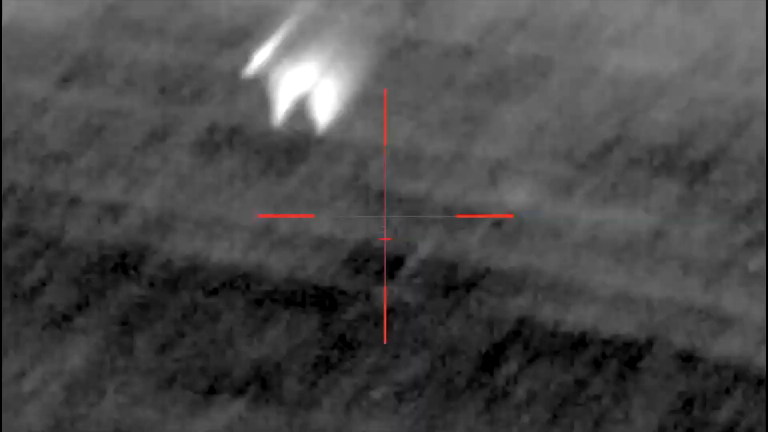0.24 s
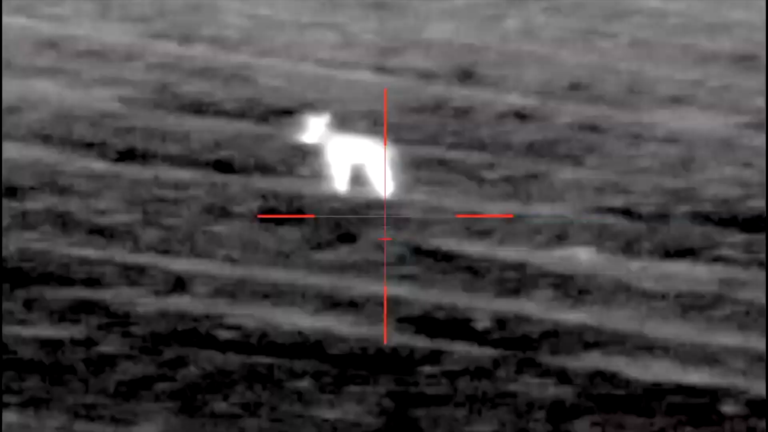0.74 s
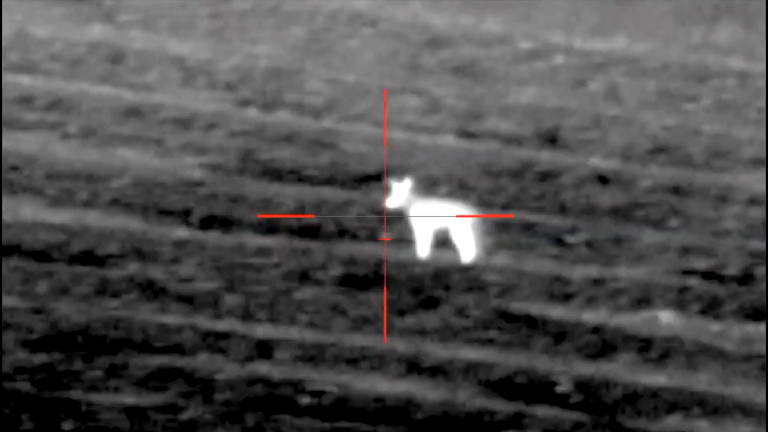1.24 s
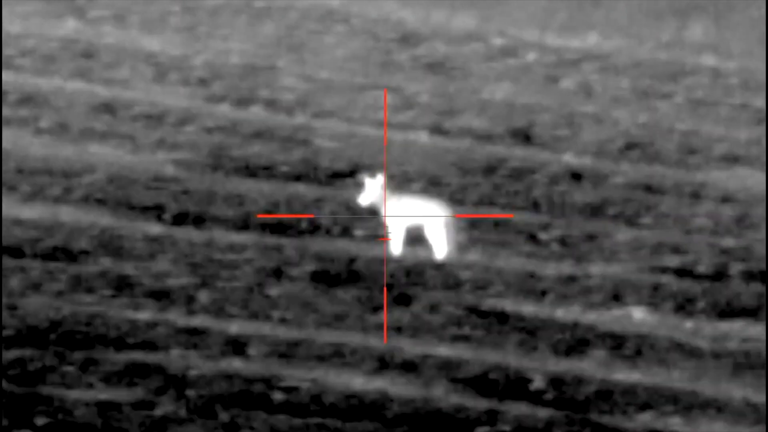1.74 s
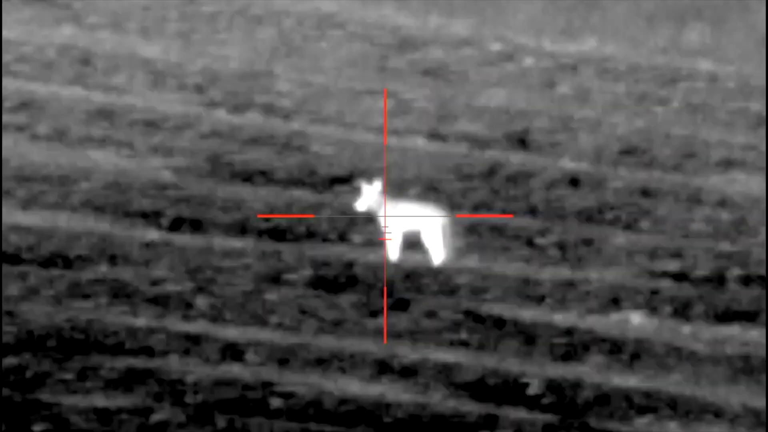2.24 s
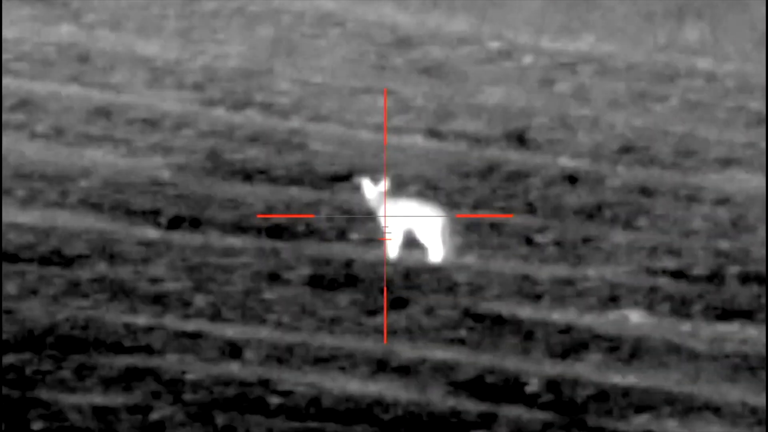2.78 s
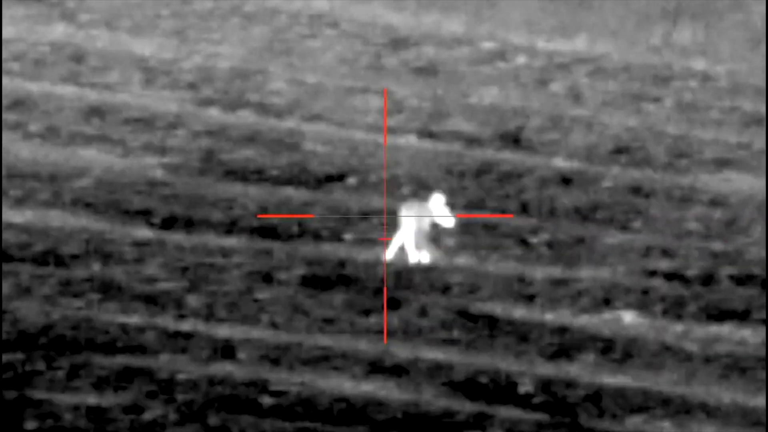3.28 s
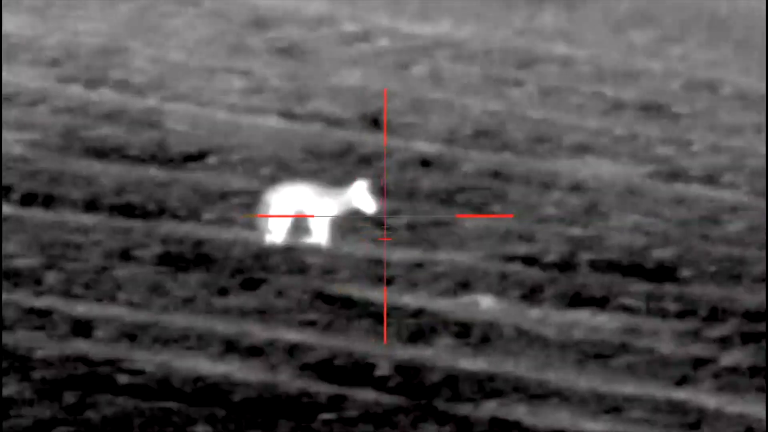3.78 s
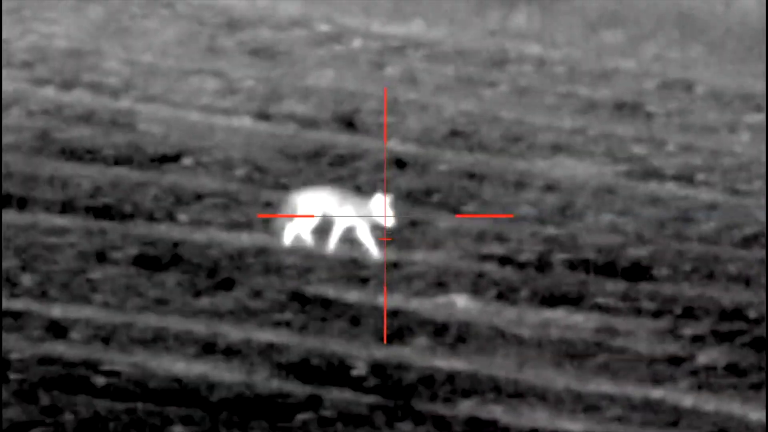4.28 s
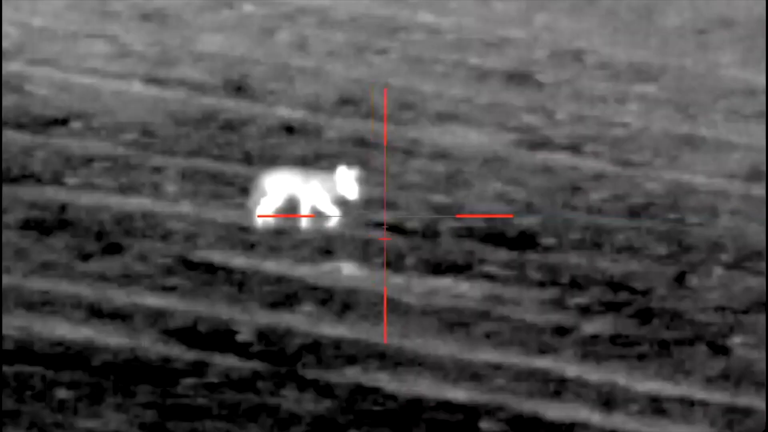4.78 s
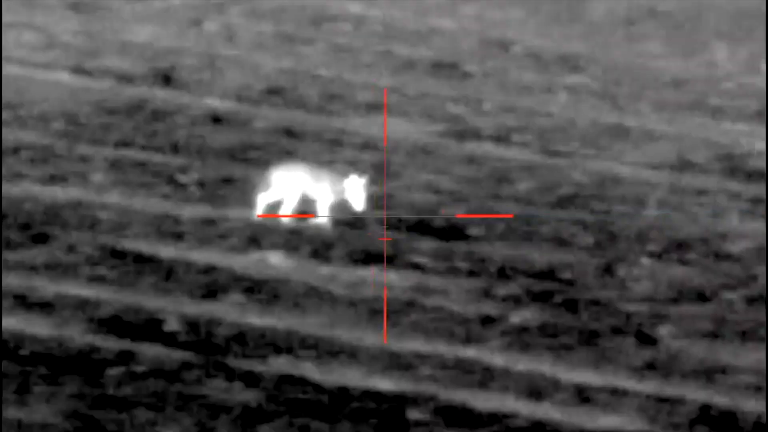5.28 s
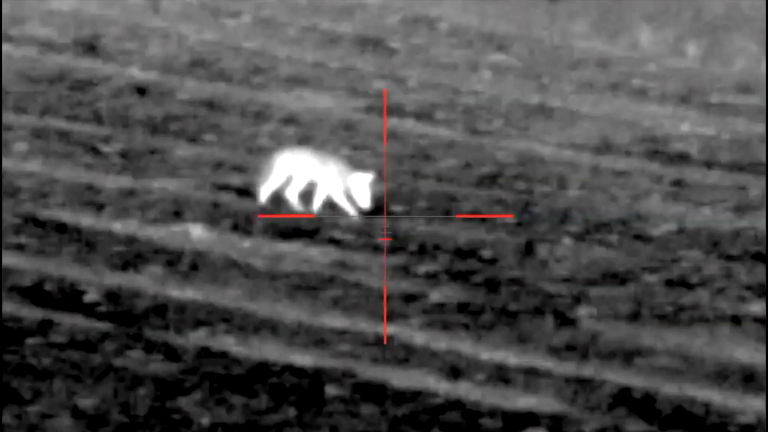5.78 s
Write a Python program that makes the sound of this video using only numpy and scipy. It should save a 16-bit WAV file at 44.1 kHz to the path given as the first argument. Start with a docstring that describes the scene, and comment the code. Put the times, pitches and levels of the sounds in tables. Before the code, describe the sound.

A near cricket gives three loud three-stroke chirps over a steady low insect trill and distant chorus, with soft gear knocks early on.

```python
"""Gear knocks and rustles briefly over a low even trill, a far insect chorus and a faint hiss in an open field at night.
A quick caller throbs in phrases, high chirpers pip above, and a near cricket joins, three strong strokes a chirp.
Wind buffets low underneath. Insects are mostly short bent near-sines or a gated sine, most with scattered tails;
knocks are decaying modes plus a noise crack; rustle, an opening chorus swell, wind and floor are shaped noise."""
import sys
import numpy as np
from scipy import signal
from scipy.fft import rfft, irfft
from scipy.io import wavfile
from scipy.ndimage import uniform_filter1d

SR = 44100
rng = np.random.default_rng(int(sys.argv[2]) if len(sys.argv) > 2 else 0)


def master(y):
    """Save y as 16-bit WAV."""
    cut = np.clip(np.atleast_2d(y).T, -1, 1)
    pcm = np.round(cut * 32767)  # scale
    wavfile.write(sys.argv[1], SR, pcm.astype(np.int16))


N = 265482


def undb(db):
    """Gain of a level in dB."""
    return 10 ** (np.asarray(db) / 20)


def curve(rows):
    """Columns of a table of (s, value, ..) interpolated at every sample."""
    s, *columns = np.transpose(rows)
    return [np.interp(np.arange(N) / SR, s, c) for c in columns]


def colour(x, points):
    """Filter by (Hz, dB) points joined on a log frequency axis."""
    hz, db = np.transpose(points)
    bin_hz = np.maximum(np.arange(len(x) // 2 + 1) * SR / len(x), 1)
    gain = undb(np.interp(np.log(bin_hz), np.log(hz), db))
    return irfft(rfft(x) * gain, len(x))


def unit(x):
    """Scale to rms 1."""
    return x / np.sqrt(np.mean(x ** 2))


def walk(rate_hz):
    """Random levels held 1 / rate_hz seconds, smoothed twice over that time; rms about 1."""
    hold = int(SR / rate_hz)
    steps = np.repeat(rng.standard_normal(N // hold + 1), hold)
    smooth = uniform_filter1d(uniform_filter1d(steps, hold), hold)
    return unit(smooth[:N])


def add(out, start_s, sound):
    """Mix a short sound in at a time, clipped to the scene."""
    i = int(start_s * SR)
    a, b = max(i, 0), min(i + len(sound), N)
    if b > a:
        out[a:b] += sound[a - i:b - i]


def stroke(shape, length_s, hz, bend, turn, third_db=-120):
    """One wing stroke: the file drives the wing membrane as a near sine that swells, bends and dies."""
    share, db, sag = np.transpose(shape)
    at_share = np.arange(share[0], share[-1], 1 / (length_s * SR))
    pitch_hz = hz + bend * np.interp(at_share, share, sag)
    phase = 2 * np.pi * (turn + np.cumsum(pitch_hz) / SR)
    gain = undb(np.interp(at_share, share, db))
    gain = uniform_filter1d(gain, len(at_share) // 14 + 1)  # the wing's mass rounds the corners
    third = undb(third_db) * gain ** 3 * np.sin(3 * phase)
    return gain * np.sin(phase) + third


def strokes(times_s, db, hz, length_s, fall_hz, scatter_db=0., scatter_hz=0.):
    """Many small falling strokes centred on their times, with scattered level, pitch and phase."""
    # Each row: share of the stroke length, level in dB, pitch bend as a share of the fall.
    small_shape = [(0, -30, 0), (.15, -12, .05), (.4, -2, .4), (.55, 0, .55), (.75, -4, .85), (1., -22, 1.)]
    out, chance = np.zeros(N), rng.standard_normal((len(times_s), 3))
    for t, level_db, f, (a, b, turn) in zip(times_s, db, hz, chance):
        start_hz = f + fall_hz / 2 + scatter_hz * b
        sound = stroke(small_shape, length_s, start_hz, -fall_hz, turn)
        add(out, t - length_s / 2, undb(level_db + scatter_db * a) * sound)
    return out


def beats(rate_hz, lead):
    """Sample numbers at which a singer strikes; lead shifts the even beat, in strokes."""
    count = np.floor(rate_hz * np.arange(N) / SR + lead)
    return np.flatnonzero(np.diff(count) > 0)


def field(x, t60_s, wet_db, stir_hz=150., gap_s=0.):
    """A scattered tail from grass and ground; moving air and blades stir it, which blurs its pitch."""
    t = np.arange(int(SR * .3)) / SR
    decay = np.exp(-np.log(1000) * t / t60_s)
    onset = np.clip((t - gap_s) / 0.012, 0, 1)
    tail = rng.standard_normal((2, len(t))) * decay * onset
    wet = sum(walk(stir_hz) * signal.fftconvolve(x, path)[:N] for path in tail)
    return undb(wet_db) * wet / np.sqrt(np.sum(tail ** 2))


def floor():
    """Air and self noise in octave bands that each flicker; the treble part also swells slowly."""
    # Each row: frequency in Hz, relative density in dB per Hz.
    floor_colour = [(20, -32.5), (60, -23.5), (120, -13.5), (380, -25.5), (700, -28.5), (1750, -34.5),
                    (3400, -34.5), (4000, -31.5), (5000, -9.5), (5700, -18), (6900, -38.5), (8500, -32),
                    (10300, -25), (12000, -30), (15600, -32.5)]
    # Treble hiss swell. Each row: time in seconds, gain in dB.
    hiss_swell = [(0, 8), (.5, 1.5), (1.1, 0), (2.5, 0), (3.0, 0.5), (3.45, -5), (4.2, -5), (4.55, 0),
                  (5.2, -2), (6.02, -3.5)]
    bed = unit(colour(rng.standard_normal(N), floor_colour)) * undb(-60.5)
    out, together, swell_db = 0, walk(16), curve(hiss_swell)[0]
    for hz in 30 * 2. ** np.arange(10):
        band = colour(bed, [(hz / 2, -60), (hz / 1.615, -14), (hz / 1.273, -6), (hz, 0),
                            (hz * 1.61, -6), (hz * 1.796, -14), (hz * 2, -60)])
        flicker_db = 1.1 * together + 1.3 * walk(18)
        out = out + band * undb(flicker_db + swell_db * (hz > 6000))
    return out


def tree_cricket():
    """Even low trill, each stroke falling; an echo follows it and a thin tail from the distance."""
    # Each row: time in seconds, lead on an even beat in strokes, stroke level in dB.
    trill = [(0, 0.45, -51.5), (1.4, 0.45, -49), (2.2, 0.45, -50), (2.9, 0.49, -51), (3.6, 0.5, -52.5),
             (4.1, 0.43, -51.5), (4.9, 0.35, -49.5), (5.6, 0.3, -49.5), (6.02, 0.39, -51)]
    lead, db = curve(trill)
    at = beats(22.56, lead)
    dry = strokes(at / SR, db[at], np.full(len(at), 2695.), 0.023, 210., scatter_db=0.3, scatter_hz=15.)
    echo = undb(-12.0 + 2.3 * walk(30)) * np.roll(dry, int(0.012 * SR))
    near_tail = field(dry, 0.054, -16.5, stir_hz=110.0)
    far_tail = field(dry, 0.25, -15, stir_hz=50.0)
    return dry + echo + near_tail + far_tail


def chorus():
    """Far singers trill on their own beats, coming and going; a crowd behind them strikes at random."""
    # Each row: pitch in Hz, strokes a second, mean stroke level in dB before the swell.
    singers = [(4370, 41, -73), (4625, 64, -65), (4707, 54, -61), (4870, 67, -58.5), (4957, 110, -58.5),
               (5180, 92, -54.5), (5280, 59, -58.5), (5424, 120, -58)]
    # Each row: centre pitch in Hz, pitch spread in Hz, strokes a second, mean level in dB before the swell.
    crowd = [(4777, 270, 340, -65.5), (6344, 220, 130, -73), (2091, 40, 300, -77.5)]
    # Each row: time in seconds, gain in dB.
    chorus_swell = [(0, -1), (.45, 2.5), (1.0, 3), (2.28, -2), (2.9, .5), (3.2, -1), (4.05, -1.5),
                    (4.36, 1.5), (6.02, -2.5)]
    out = np.zeros(N)
    for hz, rate_hz, db in singers:
        at = beats(rate_hz, rng.random())
        level_db = db + 3.77 * walk(9)[at]
        out += strokes(at / SR, level_db, np.full(len(at), hz), .012, 80., scatter_db=1.5, scatter_hz=30.5)
    for centre_hz, spread_hz, rate_hz, db in crowd:
        times_s = rng.random(2000)[:int(rate_hz * N / SR)] * N / SR
        count = len(times_s)
        out += strokes(times_s, np.full(count, db), np.full(count, centre_hz), 0.01, 120.0,
                       scatter_db=3.5, scatter_hz=spread_hz)
    return (out + field(out, 0.084, -2.5)) * undb(curve(chorus_swell)[0])


def wind():
    """Low buffeting on the microphone: a wandering breeze, and gusts that swell and drop."""
    # Each row: time in seconds, mean breeze level in dB.
    breeze = [(0, -77), (1.6, -74), (2.8, -75), (3.7, -84), (4.4, -72.5), (5.1, -77), (6.02, -84)]
    # Each row: peak time in seconds, peak level in dB before flicker, time from peak to 1/e in seconds.
    gust_rows = [(0.368, -68, 0.053), (.6, -71, 0.054), (1.05, -68, 0.028), (1.272, -69.5, 0.037),
                 (1.53, -64, 0.038), (1.83, -68.5, 0.047), (3.0, -62.5, 0.028), (4.29, -64.5, 0.092),
                 (4.533, -59.5, .05), (4.938, -67, .07), (5.35, -69, 0.031), (5.979, -70, .03)]
    low = colour(rng.standard_normal(N),
                 [(12, -32), (25, -2.5), (55, 2.0), (90, -7), (200, -25.0), (800, -61.5)])
    t = np.arange(N) / SR
    gusts = sum(undb(db) * np.exp(-((t - peak_s) / half_s) ** 2) for peak_s, db, half_s in gust_rows)
    breeze_gain = undb(curve(breeze)[0] + 2.5 * walk(4.4))
    flicker = undb(2.5 * walk(9.9))
    return unit(low) * (breeze_gain + gusts) * flicker


def knocks():
    """Soft knocks of gear: a noise crack, and the decaying modes of one small body."""
    # Each row: time in seconds, level in dB, brightness in dB per octave.
    knock_rows = [(0.065, -35, 1.5), (0.461, -46.5, -4), (0.733, -49.5, 6), (1.01, -38, 7), (1.149, -60, 2),
                  (2.08, -60.5, -34), (4.906, -75, -9), (5.208, -56, 7)]
    # Each row: mode frequency in Hz, mean relative level in dB, t60 in seconds.
    modes = [(573, -19, 0.12), (738, -2.5, 0.11), (1040, 1, 0.053), (1193, 1.5, 0.055), (1520, -4, 0.04),
             (1640, 4, 0.015), (1970, -6, 0.019), (3300, -3, 0.037)]
    out, t = np.zeros(N), np.arange(int(.12 * SR)) / SR
    chances = rng.standard_normal((len(knock_rows), len(modes)))
    for (time_s, db, tilt_db), chance in zip(knock_rows, chances):
        ring = np.zeros(len(t))
        for (hz, mode_db, t60_s), c in zip(modes, chance):
            gain = undb(mode_db + tilt_db * np.log2(hz / 1000) + 0.83 * c)
            ring += gain * np.sin(2 * np.pi * hz * t) * np.exp(-np.log(1000) * t / t60_s)
        crack = colour(rng.standard_normal(len(t)),
                       [(200, -20), (600, 0), (3500, tilt_db - 6), (4500, -40), (6000, -70)])
        crack = crack * np.exp(-t / .009)
        blow = ring / np.abs(ring).max() + undb(-5) * crack / np.abs(crack).max()
        add(out, time_s - .003, undb(db) * blow * np.minimum(t / 0.0044, 1))
    return out


def rustles_and_opening_swell():
    """Rustles of cloth and grass, and an opening chorus swell near 5.4 kHz: grainy noise bands that die away."""
    # Each row: start in seconds, decay length in seconds, level in dB, centre in Hz, nominal width in Hz.
    # The 5440 Hz row is the chorus swell.
    band_rows = [(0, 0.62, -74, 910, 1230), (0, 0.33, -51, 5440, 940), (0.082, 0.38, -65.5, 3860, 704),
                 (0.42, 0.26, -72.5, 650, 498), (0.811, 0.33, -72, 354, 250), (0.861, 0.13, -61, 1490, 297),
                 (0.881, 0.33, -68, 890, 500), (0.986, 0.16, -68, 1454, 148),
                 (1.783, 0.42, -77.5, 745, 302), (4.895, 0.11, -71.5, 825, 348),
                 (5.188, 0.064, -69, 343, 149.2)]
    out = np.zeros(N)
    grains = rng.standard_normal(N) * undb(2.2 * walk(120))
    for start_s, length_s, db, hz, width_hz in band_rows:
        edges_hz = [hz - width_hz / 1.9, hz + width_hz / 2.4]
        sos = signal.butter(2, edges_hz, "band", fs=SR, output="sos")
        band = unit(signal.sosfilt(sos, grains))
        age = (np.arange(N) / SR - start_s) / length_s
        out += undb(db) * band * np.clip(age / 0.065, 0, 1) * np.exp(-np.clip(age, 0, 5) ** 2)
    return out


def caller():
    """Quick strokes in phrases that swell and stop; the wing rings in step from stroke to stroke."""
    # Each row: time in seconds, lead on an even stroke beat in strokes.
    stroke_lead = [(0, 0.29), (.5, 0.2), (2., 0.24), (3., 0.068), (4., 0.014), (4.6, .1), (5., -0.11),
                   (6.02, -0.054)]
    # Each row: time in seconds, lead on an even phrase beat in phrases.
    phrase_lead = [(0, .9), (.5, .9), (.8, .97), (1., .8), (1.7, .84), (3.25, .7), (4.3, 1.12), (4.96, .97),
                   (6.02, .9)]
    # Each row: time in seconds, mean phrase level in dB, mean pitch in Hz.
    phrase_rows = [(.1, -43, 5440), (.26, -46, 5420), (.43, -38.5, 5434), (.59, -36.5, 5330),
                   (.75, -35, 5385), (.93, -41, 5454), (1.1, -56, 5305), (1.26, -46, 5290),
                   (1.57, -46.5, 5385), (1.75, -47.5, 5270), (2.04, -45, 5400), (2.2, -50, 5300),
                   (2.37, -47, 5276), (2.85, -51.5, 5300), (3.0, -45.5, 5390), (3.33, -51, 5380),
                   (4.2, -56, 5350), (4.4, -42.5, 5410), (4.56, -44.5, 5460), (4.72, -40, 5440),
                   (4.89, -44, 5450), (5.05, -52, 5350), (6.02, -61, 5390)]
    stroke_rate_hz, phrase_rate_hz = 67.3, 6.26
    rise_share, fall_share, gap_db = .5, .2, -14  # shares of a phrase; level between phrases
    t = np.arange(N) / SR
    beat = phrase_rate_hz * t + curve(phrase_lead)[0]
    # a phrase keeps the level and pitch found .6 of the way through it
    held = np.minimum(np.searchsorted(beat, np.floor(beat) + .6), N - 1)
    db, hz = (column[held] for column in curve(phrase_rows))
    place = beat % 1
    phrase = np.clip(np.minimum(place / rise_share, (1 - place) / fall_share), 0, 1)
    turns = stroke_rate_hz * t + curve(stroke_lead)[0]
    throb = (.5 + .5 * np.cos(2 * np.pi * turns)) ** 0.71
    wing = np.sin(2 * np.pi * np.cumsum(hz + 10.0 * walk(40)) / SR)
    level_db = uniform_filter1d(db, SR // 100) + gap_db * (1 - phrase) + 1.8 * walk(70)
    dry = undb(level_db) * throb * wing
    return dry + field(dry, .06, -13)


def high_chirpers():
    """Single falling pips, even ticks, stray strokes from the chorus, and closer, drier buzzes."""
    # Each row: middle in seconds, peak in dB, pitch in Hz.
    pips = [(0.186, -58, 6030), (0.2656, -56, 6140), (0.696, -55, 6140), (0.7854, -52, 6280),
            (0.8084, -55, 6300), (1.112, -60, 6330), (1.425, -58, 6370), (1.714, -57, 6330),
            (2.3504, -54, 6360), (2.665, -60.5, 6390), (3.635, -58, 6380), (4.0415, -56.5, 6330),
            (4.3553, -54.5, 6340), (4.7115, -55, 6330), (4.802, -56, 6320), (4.816, -58, 6400),
            (5.089, -53, 6360), (5.28, -58, 6340), (5.4324, -59, 6380)]
    # Stray chorus strokes. Each row: middle in seconds, peak in dB, pitch in Hz.
    solos = [(0.370, -42, 4890), (0.6733, -39.5, 5070), (0.8105, -45, 4800), (1.048, -41.5, 4910),
             (1.3333, -46, 4910), (1.9928, -44, 5130), (2.8853, -45.5, 4996), (4.1818, -39, 4930),
             (5.365, -47, 5250), (5.933, -48, 5190)]
    # Each row: first tick in seconds, end in seconds, ticks a second, mean pitch in Hz, mean level in dB.
    tickers = [(.52, 3.42, 11.76, 6434, -65.5), (3.35, 3.9, 11, 6720, -71)]
    # Five growing strokes a row: first stroke in seconds, mean last stroke level in dB, pitch in Hz.
    buzzes = [(5.284, -43.5, 6520), (5.802, -45, 6520)]
    t, db, hz = np.transpose(pips)
    out = strokes(t, db, hz, 0.032, 270.0)
    t, db, hz = np.transpose(solos)
    out += strokes(t, db, hz, 0.016, 65.0)
    for first_s, last_s, rate_hz, hz, db in tickers:
        t = np.arange(first_s, last_s, 1 / rate_hz)
        out += strokes(t, np.full(len(t), db), np.full(len(t), hz), 0.017, 80.,
                       scatter_db=3.5, scatter_hz=20.)
    buzz, k = np.zeros(N), np.arange(5)
    for start_s, db, hz in buzzes:
        buzz += strokes(start_s + .006 + .0142 * k, db - 1.6 * (4 - k), np.full(len(k), hz), .012, 90.,
                        scatter_db=.7)
    return out + field(out, .1, -3) + buzz + field(buzz, .05, -14)


def cricket():
    """The near cricket; weak strokes are lower in pitch and sag less than strong ones."""
    # Faint low stroke that opens each chirp. Each row: middle in seconds, peak in dB, pitch in Hz.
    pickup = [(1.3149, -59, 3490), (2.705, -60, 3490), (4.228, -65.5, 3400)]
    # One stroke a row: start in seconds, nominal length in seconds, peak in dB.
    chirp_strokes = [(1.3836, 0.016, -19), (1.437, 0.021, -14), (1.5068, 0.02, -11.5),
                     (2.7755, 0.0141, -17.5), (2.8315, 0.019, -13), (2.901, 0.018, -11.5),
                     (4.2985, 0.019, -17), (4.3582, 0.02, -12.5), (4.4316, 0.02, -11)]
    # The wing slows and the pitch sags at the end.
    # Each row: share of the nominal length, level in dB, pitch bend in Hz at full effort.
    chirp_shape = [(-.15, -45, 0), (0, -19, 0), (.14, -8.5, -40), (.5, -.8, 0), (.8, 0, -15),
                   (.95, -4, -90), (1.1, -15, -300), (1.4, -27, -520), (1.8, -56, -700)]
    # Echoes off ground and grass. Each row: delay in seconds, level in dB.
    echo_rows = [(.0042, -22.5), (.009, -16)]
    full_db, full_hz, hz_per_db = -11.5, 4281, 16  # a full stroke
    t, db, hz = np.transpose(pickup)
    out = strokes(t, db, hz, .022, 280.)
    out += field(out, .08, 0.89)
    for (start_s, length_s, db), turn in zip(chirp_strokes, rng.random(len(chirp_strokes))):
        hz = full_hz + hz_per_db * (db - full_db)
        effort = np.clip((db + 20.5) / 5, .1, 1)
        sound = stroke(chirp_shape, length_s, hz, effort, turn, third_db=-50.5)
        add(out, start_s + chirp_shape[0][0] * length_s, undb(db) * sound)
    echoes = sum(undb(db) * np.roll(out, int(lag_s * SR)) for lag_s, db in echo_rows)
    return out + echoes + field(out, .13, -30, stir_hz=440.0, gap_s=0.0082)


def scene():
    """Everything sits in the middle; a very faint steady coloured noise differs left and right."""
    # Each row: frequency in Hz, relative density in dB per Hz.
    side_colour = [(60, -2.5), (300, 3.5), (2000, 3.5), (4200, 8), (6000, -11.5), (15000, -1.5)]
    night = floor() + tree_cricket() + chorus() + wind()
    mid = night + rustles_and_opening_swell() + knocks() + caller() + high_chirpers() + cricket()
    side = unit(colour(rng.standard_normal(N), side_colour)) * undb(-94)
    return np.array([mid + side, mid - side])


def record(dry):
    """The recorder cuts the top with a steep elliptic low-pass."""
    top_hz = 15710
    return signal.sosfilt(signal.ellip(12, .2, 80, top_hz, fs=SR, output="sos"), dry)


dry = scene()
out = record(dry)
master(out)
```